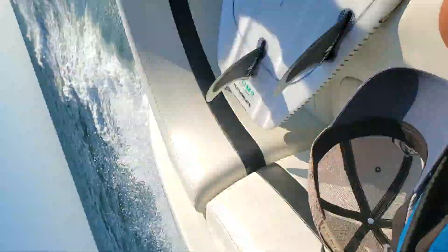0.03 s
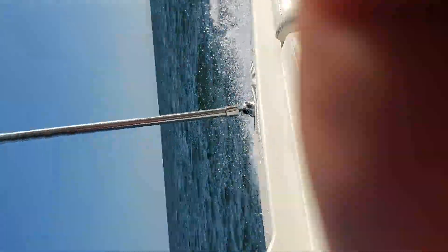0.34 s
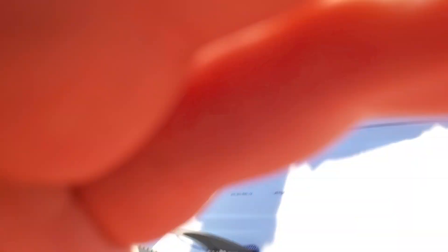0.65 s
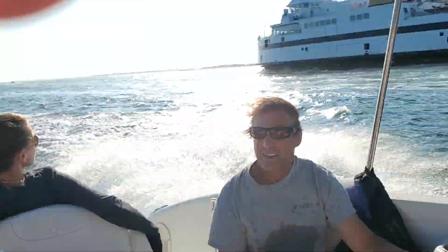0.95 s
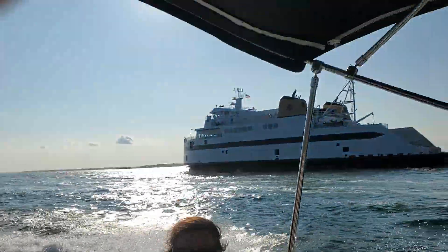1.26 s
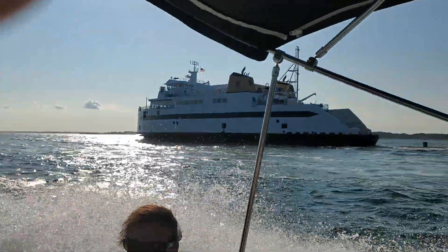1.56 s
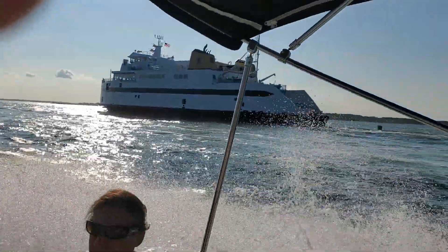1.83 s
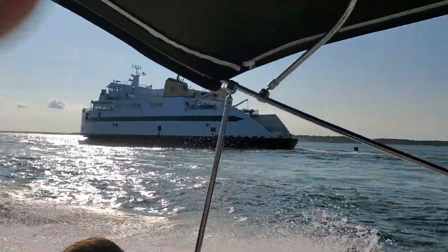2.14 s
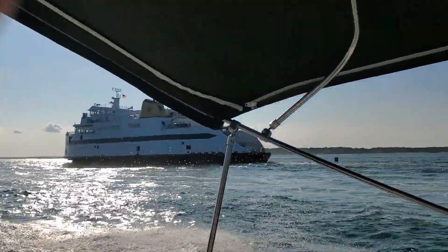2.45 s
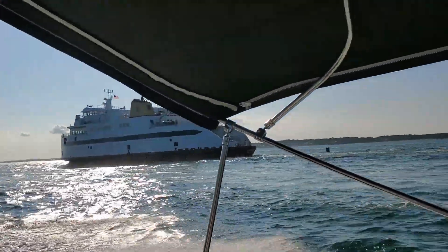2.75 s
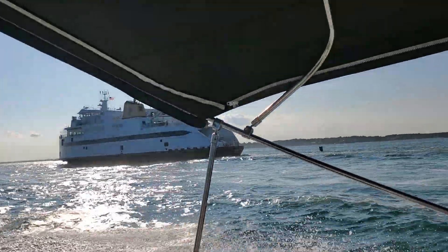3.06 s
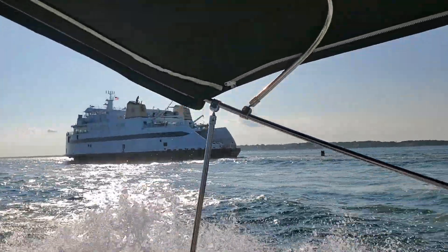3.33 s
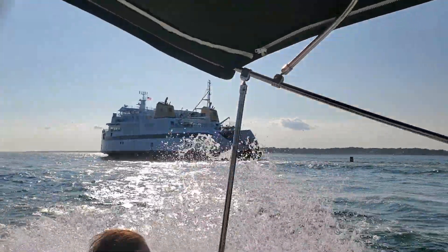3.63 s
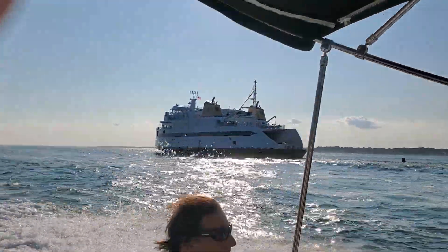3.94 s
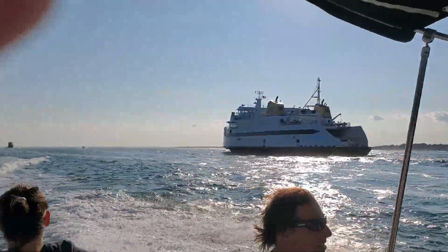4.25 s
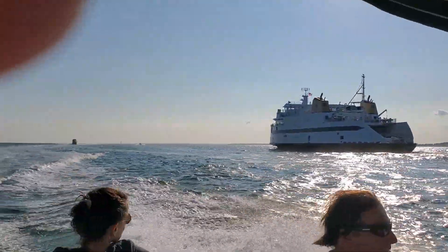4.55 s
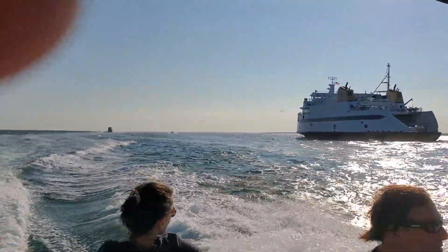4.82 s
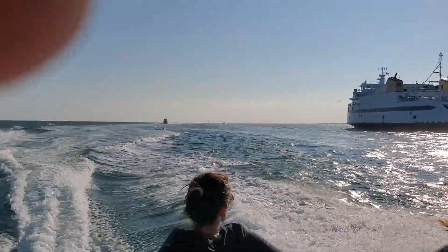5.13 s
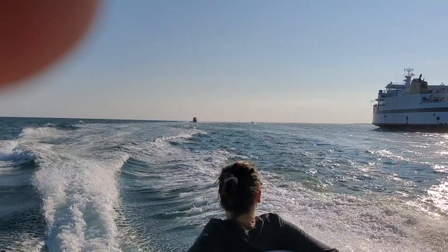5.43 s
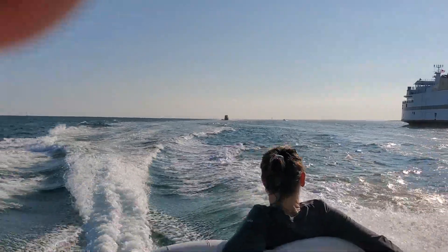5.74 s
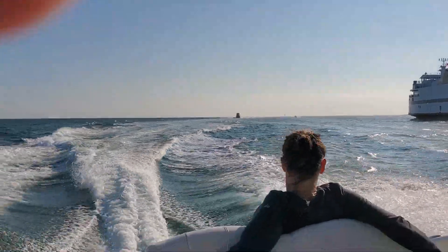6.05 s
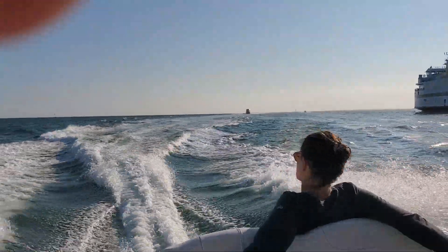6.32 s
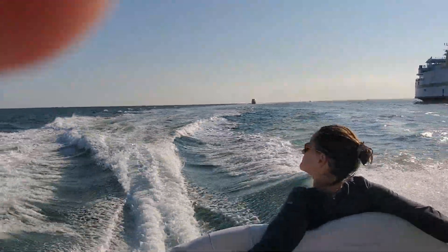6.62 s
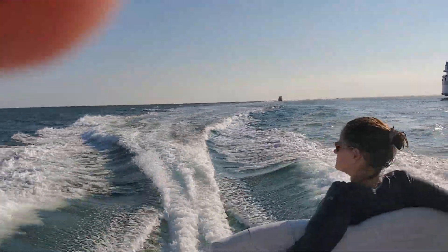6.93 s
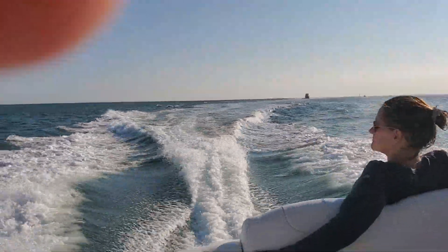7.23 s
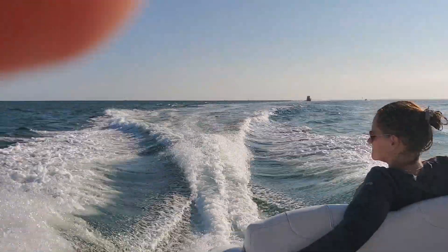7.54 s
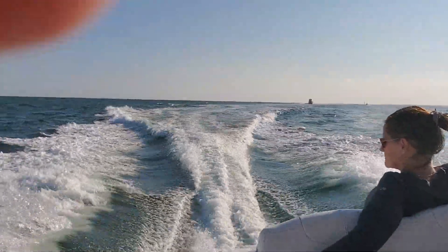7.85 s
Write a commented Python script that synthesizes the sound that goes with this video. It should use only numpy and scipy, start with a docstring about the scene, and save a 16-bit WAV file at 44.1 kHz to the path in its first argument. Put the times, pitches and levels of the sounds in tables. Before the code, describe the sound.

A motorboat runs at speed across open water, heard close up from its open cockpit. Wind thumps on the microphone for the first second. Two engines drone roughly, with a throbbing pulse, a thin gear whine and a low hull rumble. The wake roars and spray hisses in surges as the boat rides the waves. One dull knock comes near the middle, and the engines gradually ease slightly in pitch.

```python
"""Cockpit of an open twin-engine motorboat on the plane, stereo microphone under the awning.
The sound cuts in with wind thumping on the microphone, which swings round to face the wake within a second.
Close by, two engines run slightly apart in speed, so the propellers throb over a rough drone, a thin
gear whine and the rumbling hull. Waves lift the boat about every 1.6 s; the wake roars and spray hisses.
Near 3.4 s something knocks dully, and the boat runs on through a turn, its engines slowly losing speed."""
import sys
import numpy as np
from scipy import signal
from scipy.fft import rfft, irfft, next_fast_len
from scipy.io import wavfile

SR = 44100
rng = np.random.default_rng(int(sys.argv[2]) if len(sys.argv) > 2 else 0)


def transcribe(u):
    """Save the signal u as a 16-bit wav file named by the first command-line argument.

    u: samples, shape (n,) or (channels, n), limited to [-1, 1]; the rate is SR.
    q: integer samples, one column per channel.
    """
    v = np.clip(np.atleast_2d(u).T, -1, 1)
    q = np.round(v * 32767).astype(np.int16)
    wavfile.write(sys.argv[1], SR, q)


N = 347508
TIME = np.arange(N) / SR
BIN_HZ = np.maximum(np.fft.rfftfreq(next_fast_len(N), 1 / SR), 1)

# colour of the two microphone ports: f/Hz, left minus right/dB
PORT_BALANCE = [(600, 0.0), (950, -1), (1300, 0), (1800, 0), (2300, 1.5), (3100, 0), (3900, 2.5), (5000, 0),
                (6500, -2), (8200, 1.5), (10300, 0), (12000, 0.5), (14000, 4)]
# wind on the microphone: f/Hz, relative density/dB
WIND_SPECTRUM = [(18, -16), (36, -5), (50, 7), (68, -14)]
# rumble of hull and wind: f/Hz, relative density/dB
RUMBLE_SPECTRUM = [(12, -22), (25, -23), (42, -2.5), (62, 3), (110, -3), (150, -2.5), (190, -9),
                   (300, -8.5), (430, -12), (500, -15), (700, -41)]
# boom of the hull when pushed hard: f/Hz, relative density/dB
BOOM_SPECTRUM = [(85, -22), (102, 0), (130, 2), (165, 3), (200, -7)]
# load on engines and hull: t/s, level/dB
LOAD = [(.5, -22.5), (1.05, -24.5), (2.3, -21), (4.2, -22.5), (5.1, -20.5), (5.9, -21.5), (7.8, -19.5)]
# churning water: f/Hz, relative density/dB
CHURN_SPECTRUM = [(330, -17), (480, -3), (620, 0.5), (800, -2), (1000, -4), (1250, -5), (1600, -21)]
# breaking wake: f/Hz, relative density/dB
WAKE_SPECTRUM = [(950, -12), (1260, -1.5), (1520, -.5), (1780, 2), (2080, -0.5), (2330, 0.5), (2600, -5),
                 (3100, -12.5)]
# fine bubbles of the foam: f/Hz, relative density/dB
FOAM_SPECTRUM = [(2500, -8), (3100, 0), (3750, 0), (4250, -2.5), (4700, -6.5), (5300, -26)]
# falling spray: f/Hz, relative density/dB
SPRAY_SPECTRUM = [(3900, -17), (4900, 0.5), (6500, 1.5), (7200, -2), (8100, -5.5), (8800, -5), (9600, -3.5),
                  (10600, -3.5), (11900, 1.5), (14000, 0), (16000, -2)]
# side from which the spray reaches the microphone: t/s, left minus right/dB
SPRAY_SIDE = [(.55, 4), (1.2, -0.5), (4.1, -1), (4.9, 1), (7.88, 0.5)]
# sheets of water thrown up by the hull: t/s, hold/s, fade/s, wake level/dB, spray level/dB
SPLASHES = [(.3, 0.23, 0.053, -39, -37.5), (.7, 0.1, 0.12, -37, -54), (1.067, 0.083, 0.28, -35.5, -49),
            (1.418, 0.15, 0.34, -39, -36), (1.686, 0.91, 0.79, -32.5, -33.5),
            (2.33, 0.12, 0.065, -36, -31.5), (2.614, 0.14, 0.21, -31.5, -32.6),
            (3.495, 0.61, 0.35, -35.5, -36), (3.995, 0.83, 0.52, -38.5, -39.5),
            (4.814, 0.53, 0.66, -38.1, -38.5), (5.603, 0.65, 0.68, -37.5, -39.5),
            (6.047, 0.2, 0.49, -33.5, -36.2), (6.35, 0.56, 0.57, -38, -37), (7.01, 0.24, .1, -33, -37.5),
            (7.438, 0.84, 0.77, -34, -35.5)]
# dull knock on the boat: t/s, contact level/dB
KNOCKS = [(3.357, -9)]
# modes of the boat's shell: f/Hz, level relative to the contact/dB, t60/s
SHELL_MODES = [(230, -5, 0.05), (370, -7, 0.04), (690, -5.5, 0.012), (1050, -12, 0.017)]
# waves under the boat: crest t/s, engine speed gain/(rev/s), lead of the throb/s, throb gain/dB
WAVES = [(.17, 0.24, 0, 7), (1.76, 0.67, 0.39, 3.5), (2.45, 0.019, 0.21, 4), (3.51, .5, 0.26, 8),
         (4.78, .69, 0, 7.5), (6.57, 0.68, 0.11, 5.5), (7.95, .47, 0, -5)]
# the faster engine slows through the turn: t/s, crank speed/(rev/s)
FAST_SPEED = [(0, 55.84), (4.33, 53.23), (7.88, 52.07)]
# the other engine lags, most where the turn is tightest: t/s, speed deficit/(rev/s)
SLOW_LAG = [(.8, 2.0), (1.1, 2.53), (1.7, 3.05), (2.8, 2.235), (6.8, 2.126), (7.3, 2.06)]
# swells of the faster engine's gear whine: t/s, level/dB
GEAR_SWELLS = [(1.1, -52), (1.78, -43), (3.08, -41.5), (4.5, -49), (5.7, -42), (6.95, -45)]
# tones of the faster engine: multiple of crank speed, level at mean load/dB
FAST_ORDERS = [(1, -26), (1.5, -23), (2, -33), (2.5, -34.5), (3, -30), (4, -33), (5, -40), (6.5, -44.5),
               (7, -40.5), (7.5, -46), (8, -38), (9, -47.5), (11, -47.5)]
# tones of the slower engine: multiple of crank speed, level at mean load/dB
SLOW_ORDERS = [(1, -36.5), (1.5, -30.5), (2, -30.5), (2.5, -32.5), (3, -45.5), (3.5, -44.5), (4, -42),
               (5, -51.5), (5.5, -43.5), (7, -46), (12, -58)]

PORT_SPACING_M, FACING_S = 0.15, 1   # the microphone faces the wake from FACING_S on
WAKE_DB, SPRAY_DB, CHURN_DB = -34, -38.5, -33   # base levels of the water between splashes
HULL_HZ, HULL_WIDTH_HZ, HUM_ORDER = 399.8, 30.5, 8   # hull resonance, and the engine order that excites it
GEAR_TEETH, BLADES_PER_REV = 23, 3 * 5 / 11   # three blades behind a 5:11 reduction gear


def from_db(db):
    """Decibels to gain."""
    return 10 ** (np.asarray(db) / 20)


def rms_one(x):
    """Scale to unit power."""
    return x / np.sqrt(np.mean(x ** 2) + 1e-20)


def in_time(points):
    """A table of (t/s, value) read at every sample."""
    return np.interp(TIME, *np.transpose(points))


def at_hz(points, beyond=None):
    """A table of (f/Hz, level/dB) read at every frequency bin."""
    hz, db = np.transpose(points)
    return np.interp(np.log(BIN_HZ), np.log(hz), db, left=beyond, right=beyond)


def pan(db):
    """Left and right gains for a level difference."""
    return from_db([db / 2, -db / 2])


def swell(s, width_s):
    """A smooth rise and fall of height 1 around time s."""
    return np.exp(-.5 * np.minimum(((TIME - s) / width_s) ** 2, 100))


def drift(hz):
    """Smooth random wander of spread 1, mostly slower than hz."""
    step, settle = 40, 2000
    pole = np.exp(-2 * np.pi * hz * step / SR)
    noise = rng.standard_normal(N // step + settle + 2)
    slow = signal.lfilter([1], [1, -2 * pole, pole * pole], noise)[settle:]
    return np.interp(np.arange(N) / step, np.arange(len(slow)), rms_one(slow))


def hiss():
    """Two unrelated white noises."""
    return rng.standard_normal((2, N))


def drops(per_s, spread_db):
    """Two streams of random impacts of uneven size; rms 1."""
    sizes = from_db(spread_db * np.minimum(rng.exponential(1, (2, N)), 4))
    signs = rng.choice([-1, 1], (2, N))
    return rms_one(sizes * signs * (rng.random((2, N)) < per_s / SR))


def ring(clicks, hz, t60):
    """Each click sets a decaying sine ringing."""
    r, w = from_db(-60 / (t60 * SR)), 2 * np.pi * hz / SR
    return signal.lfilter([0, np.sin(w)], [1, -2 * r * np.cos(w), r * r], clicks + 1e-18)


def tone(cycles, waver, rough, width):
    """A tone of rms about 1, wavering and roughened by uneven firing; a little different at each port."""
    angle = 2 * np.pi * cycles
    mid = (1 + waver * drift(2.7)) * np.sin(angle) + rough * drift(29) * np.cos(angle)
    side = width * drift(0.98) * np.cos(angle)
    return np.sqrt(2) * np.array([mid + side, mid - side])


def surround(excitation, spectrum, alike):
    """Colour two unrelated signals and let them reach the microphone ports from all around; rms 1."""
    size = next_fast_len(N)
    gain = from_db(at_hz(spectrum, beyond=-np.inf))
    # the ports agree most in the bass and part ways as the wavelength nears their spacing
    likeness = alike * np.sinc(2 * BIN_HZ * PORT_SPACING_M / 343)
    mid, side = rfft(excitation, size) * gain * np.sqrt([1 + likeness, 1 - likeness])
    ports = pan(at_hz(PORT_BALANCE)) * [mid + side, mid - side]
    return rms_one(irfft(ports, size)[:, :N])


def turned_away():
    """How far the microphone still points away from the wake, from 1 down to 0."""
    return np.maximum(1 - TIME / FACING_S, 0)


def wind():
    """Wind thumps right on the microphone as it swings round."""
    return from_db(-21.5) * turned_away() * surround(hiss(), WIND_SPECTRUM, alike=0.72)


def hull(load_db, strain_db):
    """All round the cockpit: a rumble of hull and wind, and a boom that grows faster than the load."""
    rumble_db = load_db - 2.5 - 0.33 * strain_db + 0.97 * drift(11)
    boom_db = load_db - 8.5 + 2.5 * strain_db
    rumble = from_db(rumble_db) * surround(hiss(), RUMBLE_SPECTRUM, alike=0.83)
    return rumble + from_db(boom_db) * surround(hiss(), BOOM_SPECTRUM, alike=0.65)


def splash_levels(attack_s):
    """Wake and spray in dB: each sheet of water rises, holds and dies away on top of the steady wash."""
    power = np.ones((2, N)) * from_db([[WAKE_DB], [SPRAY_DB]]) ** 2
    for s, hold_s, fade_s, wake_db, spray_db in SPLASHES:
        start = round(s * SR)
        age = TIME[:N - start]
        shape = np.minimum(age / attack_s, 1) * np.exp(-np.maximum(age - hold_s, 0) / fade_s)
        power[:, start:] += from_db([[wake_db], [spray_db]]) ** 2 * shape ** 2
    return 10 * np.log10(power)


def awning(sound, delay_s, share, sway):
    """The awning just overhead reflects the water's noise; the hollow colour shifts as the boat rocks."""
    echoes = [np.interp(TIME - delay_s * (1 + sway * drift(0.28)), TIME, port) for port in sound]
    return (sound - share * np.array(echoes)) / np.sqrt(1 + share ** 2)


def water(fast, slow):
    """Outside the cockpit: churning that pulses with the exhaust, breaking wake, foam and falling spray."""
    wake_db, spray_db = splash_levels(attack_s=0.12)
    off_axis_db = -5.5 * turned_away()
    slosh_db = 0.54 * drift(2.2)   # small surges shared by all the water
    churn_db = CHURN_DB + 0.84 * (wake_db - WAKE_DB) + 0.45 * off_axis_db + slosh_db
    wake_db = wake_db + off_axis_db + slosh_db
    spray_db = spray_db + slosh_db
    # foam needs both a breaking wake and spray falling into it
    foam_db = np.minimum(wake_db - 2.5, spray_db) + 0.6 + 0.34 * off_axis_db
    exhaust = 1 + 0.12 * (np.sin(2 * np.pi * 2 * fast) + np.sin(2 * np.pi * 2 * slow))
    churn = from_db(churn_db + .8 * drift(11)) * surround(hiss() * exhaust, CHURN_SPECTRUM, alike=1)
    wake = from_db(wake_db + .5 * drift(14)) * surround(
        hiss() + 0.74 * drops(per_s=2500, spread_db=2.0), WAKE_SPECTRUM, alike=0.88)
    foam = from_db(foam_db + .5 * drift(7)) * surround(
        hiss() + 0.47 * drops(per_s=1900, spread_db=2.5), FOAM_SPECTRUM, alike=0.4)
    spray = from_db(spray_db + 0.65 * drift(17)) * surround(
        hiss() + 0.34 * drops(per_s=6300, spread_db=-1.0), SPRAY_SPECTRUM, alike=.5)
    wash = awning(wake + foam, delay_s=0.001955, share=0.17, sway=0.079)
    return churn + wash + spray * pan(in_time(SPRAY_SIDE))


def knock(contact_s):
    """A soft, short contact, centred between the ports, sets the boat's shell ringing briefly."""
    push = sum(from_db(db) * swell(s + contact_s, contact_s) for s, db in KNOCKS)
    clicks = np.zeros(N)
    for s, db in KNOCKS:
        clicks[round(s * SR)] = from_db(db)
    return push + sum(from_db(db) * ring(clicks, hz, t60) for hz, db, t60 in SHELL_MODES)


def wave_lift(late_s):
    """Speed in rev/s that the engines gain from the waves, peaking late_s after each crest."""
    return sum(gain * swell(s + late_s, width_s=.37) for s, gain, _, _ in WAVES)


def crank_turns():
    """Turns made by the faster and the slower engine; both speed up on every wave."""
    speed = in_time(FAST_SPEED) + wave_lift(late_s=0)
    return np.cumsum([speed, speed - in_time(SLOW_LAG)], axis=1) / SR


def gear_whine(fast, slow):
    """Thin tones of meshing teeth in both gearcases; the faster one swells now and then."""
    swell_power = sum((from_db(db) * swell(s, width_s=.18)) ** 2 for s, db in GEAR_SWELLS)
    fast_gain = np.sqrt(from_db(-50) ** 2 + swell_power)
    fast_mesh = fast_gain * tone(GEAR_TEETH * fast, waver=0.12, rough=0.24, width=1.0)
    return fast_mesh + from_db(-56) * tone(GEAR_TEETH * slow, waver=.3, rough=0.51, width=.7)


def hull_hum(slow):
    """One order of the slower engine grows near the hull resonance, and as the hull settles after a wave."""
    hum_hz = HUM_ORDER * np.gradient(slow) * SR
    detuning = 2 * (hum_hz - HULL_HZ) / HULL_WIDTH_HZ
    resonant = from_db(-33.5) / (1 + detuning ** 2)
    settling_db = 7 * wave_lift(late_s=0.11)
    gain = np.hypot(from_db(-39.5), resonant) * from_db(settling_db)
    return gain * tone(HUM_ORDER * slow, waver=0.07, rough=0.033, width=0.51)


def engine(turns, orders, waver, rough):
    """A four-stroke engine close by: unequal cylinders give whole and half orders of the crank speed."""
    return sum(from_db(db) * tone(order * turns + rng.random(), waver, rough, width=0.14)
               for order, db in orders)


def propellers(fast, slow, in_step_s):
    """Two blade rates beat through the hull, about three throbs a second, harder on most waves."""
    in_step, phase = round(in_step_s * SR), rng.random()
    fast_blades, slow_blades = [
        tone(BLADES_PER_REV * (turns - turns[in_step]) + phase, waver=0.057, rough=0.088, width=0.18)
        for turns in (fast, slow)]
    bite_db = sum(db * swell(s - lead_s, width_s=0.32) for s, _, lead_s, db in WAVES)
    return from_db(-22.5 + bite_db) * (fast_blades + from_db(-2.3) * slow_blades)


def scene():
    """Both drives, the hull, wind and water at the cockpit microphone, cutting in after 0.111 s."""
    fast, slow = crank_turns()
    load_db = in_time(LOAD)
    strain_db = load_db - load_db.mean()   # the engines drone louder as the load grows
    engines = from_db(1.15 * strain_db) * engine(fast, FAST_ORDERS, waver=0.12, rough=0.14)
    engines += from_db(1.4 * strain_db) * engine(slow, SLOW_ORDERS, waver=0.4, rough=0.21)
    drives = propellers(fast, slow, in_step_s=.165) + hull_hum(slow) + gear_whine(fast, slow)
    background = hull(load_db, strain_db) + wind() + water(fast, slow)
    onset = np.clip((TIME - .111) / .002, 0, 1)
    return onset * (background + knock(contact_s=0.00036) + engines + drives)


def record(dry):
    """The microphone chain rounds the highest peaks and cuts the treble above 15.8 kHz."""
    rounded = 1.721 * np.tanh(dry / 1.88)
    return signal.sosfilt(signal.ellip(12, .1, 80, 15800, fs=SR, output="sos"), rounded)


dry = scene()
out = record(dry)
transcribe(out)
```